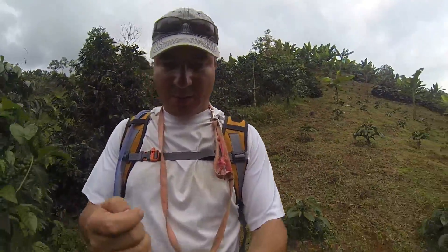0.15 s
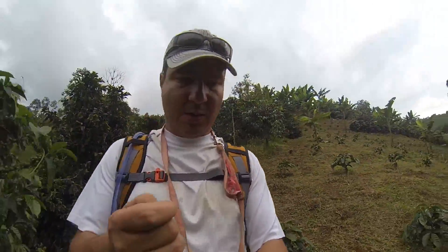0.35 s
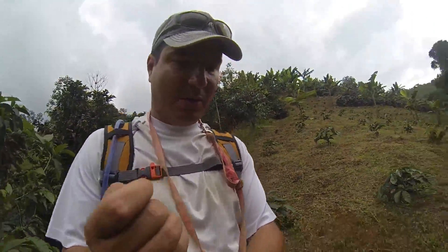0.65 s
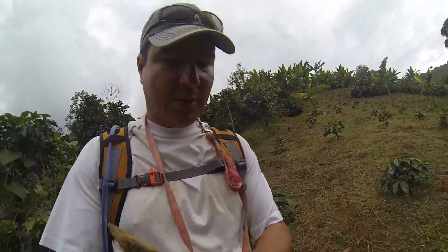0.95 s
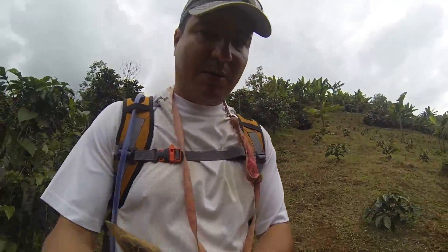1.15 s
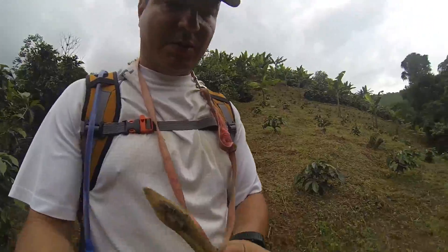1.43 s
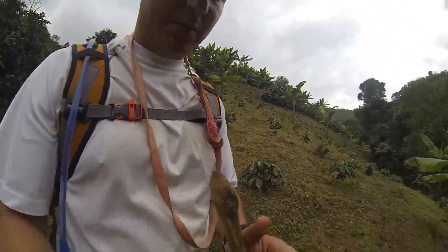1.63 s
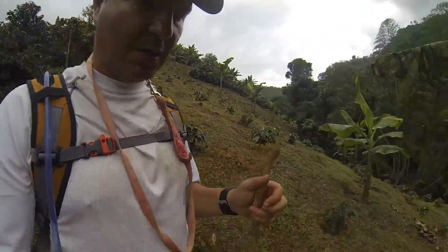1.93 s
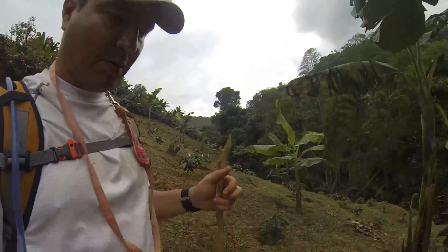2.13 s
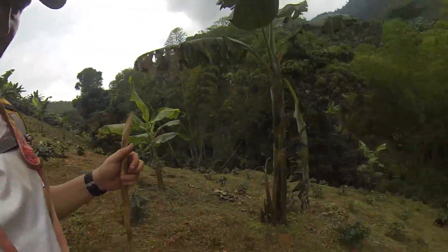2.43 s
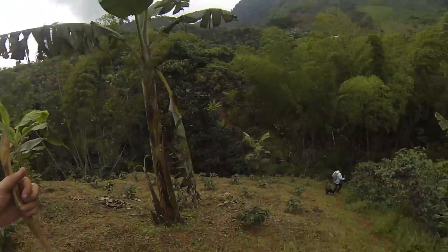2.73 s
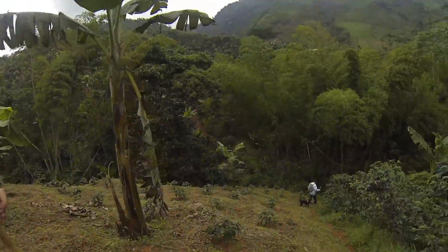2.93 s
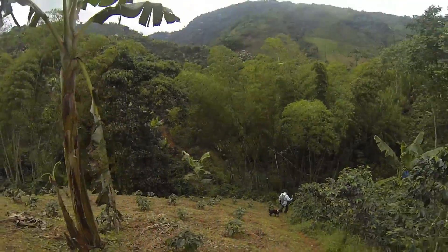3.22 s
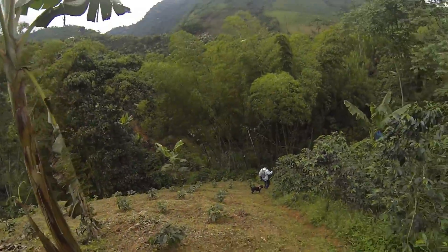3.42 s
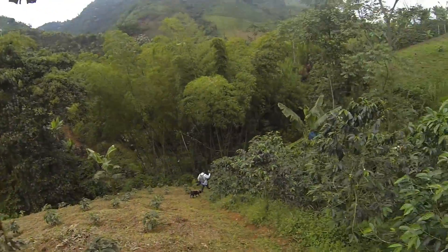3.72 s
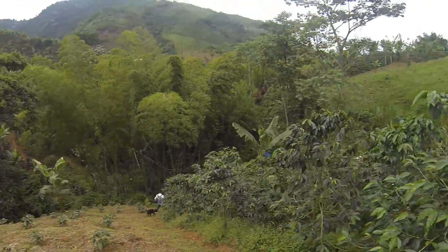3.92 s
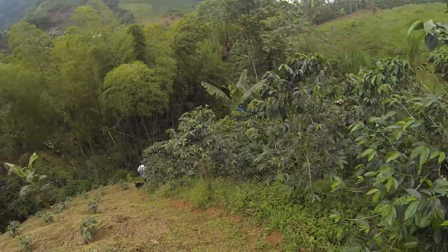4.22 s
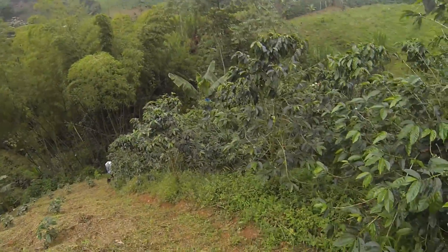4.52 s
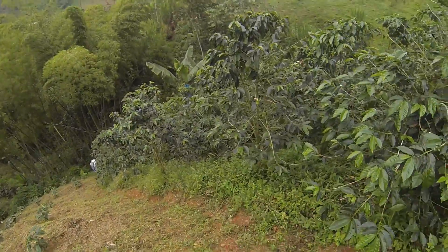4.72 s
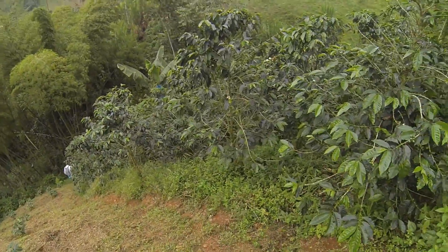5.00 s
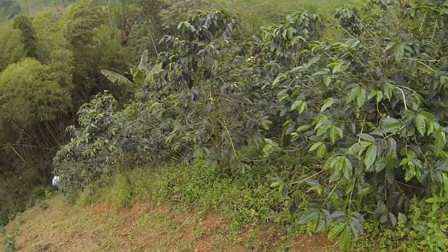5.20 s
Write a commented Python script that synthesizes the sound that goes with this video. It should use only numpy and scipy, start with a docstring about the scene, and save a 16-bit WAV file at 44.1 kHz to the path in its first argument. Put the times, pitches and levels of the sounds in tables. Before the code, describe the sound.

Handling noise comes straight through a plastic camera case outdoors: first small taps and rubs with a rumble of arm movement, then loud ringing knocks, low thumps and a short scrape as a hand slides along the pole. Skin creaks on the grip and a far bird whistles once, barely audible. After a final hard knock, only soft scuffs, low rumble, light hiss and a faint insect drone remain.

```python
"""A hiker on a quiet hillside swings round a cased camera on a pole, heard through pole and plastic case.
It opens on light knocks and rubs of the grip, over a low rumble as steps and arm movement shake the pole.
From 1.3 to 1.8 s hard knocks ring the case, the pole thumps and the hand slides with a scrape and squeak.
Sticking, slipping skin then creaks on the grip, and a far bird whistles once at 2.6 s.
After a last hard knock at 3.9 s it dies down to soft scuffs, with hiss and faint insects behind it all."""
import sys
import numpy as np
from scipy import signal
from scipy.fft import rfft, irfft
from scipy.io import wavfile
from scipy.ndimage import uniform_filter1d

SR = 44100
rng = np.random.default_rng(int(sys.argv[2]) if len(sys.argv) > 2 else 0)


def waveform_to_disk(signal):
    """Save audio, clipped to [-1, 1], as 16-bit WAV at the path in sys.argv[1]."""
    frames = np.transpose(np.atleast_2d(signal))
    scaled = np.clip(frames, -1, 1) * 32767
    samples = np.round(scaled).astype(np.int16)
    wavfile.write(sys.argv[1], SR, samples)


N = 236155
TIME = np.arange(N) / SR

# Hard knocks of the grip: start_s, peak_db, wall_pitch_hz, tilt_db_per_octave, contact_cutoff_hz
KNOCKS = [(0.012, -26.5, 1470, 8.5, 4000), (0.055, -37, 1470, 7, 3080), (0.182, -47.5, 1440, -4, 3000),
          (0.5134, -39, 1490, 8.5, 7500), (0.849, -36.5, 1500, 7, 3000), (0.964, -41.5, 1410, 9.5, 2960),
          (1.0849, -33, 1440, -3.5, 3880), (1.105, -26, 1540, 3, 1930), (1.1782, -34, 2320, -7, 4860),
          (1.273, -39, 1480, 2, 3000), (1.3508, -8.5, 1494, -0.5, 5000), (1.3701, -8.5, 1444, -2, 6850),
          (1.4493, -15.5, 2300, -1, 7960), (1.4515, -10.5, 2310, 4.5, 3200), (1.734, -8.5, 1443, -4, 2620),
          (1.998, -32.5, 1450, -6, 3000), (2.021, -34.5, 1550, 0.5, 3040), (2.034, -42, 2340, 9, 7000),
          (2.06, -34, 1530, 5.5, 5070), (2.221, -36, 1600, 5, 2950), (2.468, -36.5, 1430, -5.5, 3500),
          (2.514, -28, 1450, 1, 4000), (2.723, -38, 1440, 4, 3500), (2.971, -38.5, 1390, -4.5, 3000),
          (3.146, -43.5, 1480, 10.5, 7000), (3.189, -32, 1370, 2.5, 4020), (3.2112, -27.5, 1460, 2.5, 4000),
          (3.9108, -14, 1390, -7.5, 6000), (3.9149, -16, 1440, -2, 6450), (3.9343, -34, 1420, 2.5, 6100),
          (4.35, -45, 1500, 8, 7000), (4.506, -48, 1500, 13, 7000)]
# Resonances of pole and case: pitch_hz, width_hz, level_db
CASE_MODES = [(293.3, 49, -2), (390.6, 48.7, 0.5), (626, 193, -3.5), (790, 430, -18.5), (1860, 610, -9.5),
              (2299, 220, -6.5), (2682, 85, -13.5), (2896, 280, -20), (3600, 330, -20), (4130, 420, -23),
              (4720, 220, -24), (5740, 970, -25)]
# Rubs on the grip and, near the end, faint soft scuffs:
# start_s, end_s, level_db, slip_share (0-1), wall_pitch_hz, contact_cutoff_hz
RUBS_AND_SCUFFS = [(0.493, 0.561, -58.5, 0.4, 1486, 3500), (0.59, 0.612, -57, 0.75, 1480, 3000),
                   (0.656, 0.792, -56.5, 0.26, 1505, 3000), (0.769, 0.808, -53, 0.34, 1540, 3000),
                   (0.841, 0.914, -45, 0.53, 1496, 3600), (0.912, 0.985, -58.5, 0.4, 1670, 2750),
                   (1.082, 1.123, -50, 0, 1540, 3830), (1.126, 1.177, -46.5, 0.1, 1480, 3980),
                   (1.171, 1.204, -45, 0.16, 1577, 5600), (1.353, 1.381, -23, 0.12, 1465, 4570),
                   (2.029, 2.16, -51, 0.6, 1475, 3600), (2.202, 2.277, -38, 0.24, 1570, 2940),
                   (2.356, 2.384, -45, 0.42, 1556, 3600), (2.42, 2.516, -57.5, 0.8, 1524, 4000),
                   (2.49, 2.547, -40, 0.33, 1433, 4100), (2.57, 2.659, -37, 0.4, 1436, 4150),
                   (2.697, 2.77, -41.5, 0.42, 1440, 3200), (2.818, 2.919, -50, 0.28, 1403, 3500),
                   (3.149, 3.315, -52, 0.45, 1440, 4040), (3.176, 3.244, -35, 0.7, 1457, 4640),
                   (3.483, 3.581, -53, 0.45, 1376, 3000), (3.571, 3.645, -47, 0.6, 1438, 3570),
                   (3.911, 3.953, -34, 0.72, 1415, 4570), (4.324, 4.46, -65.5, 0.5, 1490, 5500),
                   (4.74, 4.822, -61, 0.3, 1580, 3000), (4.955, 5.01, -57, 0.5, 1660, 2980)]
# Envelope of the long hand slide, before each layer's trim: time_s, body_db, treble_db
SLIDE_ENVELOPE = [(1.385, -38.5, -49), (1.435, -30.5, -48), (1.447, -29.5, -47), (1.487, -32, -37.5),
                  (1.539, -42, -74), (1.599, -30.5, -50), (1.651, -42, -77), (1.72, -46, -65)]
# Soft jolts that flex the pole: start_s, level_db, pitch_hz, swell_s, upper_modes_relative_db
JOLTS = [(0.003, -20.5, 113, .014, -11), (0.148, -26, 61.6, 0.0099, -27), (0.501, -36.5, 110, 0.01, -6),
         (0.547, -12.5, 35.1, 0.024, -48), (0.69, -24.5, 103.7, 0.013, -23.5), (1.095, -18, 99, 0.012, -24),
         (1.139, -9, 83.6, 0.0097, -38), (1.189, -13, 94.3, 0.0096, -34.5), (1.3211, -6, 94.5, 0.0072, -28),
         (1.349, -6.5, 100, 0.0047, -37.5), (1.367, -4.5, 117.4, 0.0077, -29),
         (1.44, -10.5, 45.8, 0.017, -13), (1.732, -10.5, 114, 0.0066, -10.5),
         (1.997, -24.5, 120, 0.015, -24), (2.058, -23, 110.6, 0.02, -11), (2.462, -25.5, 112.3, 0.013, -28),
         (2.915, -21, 100, 0.0082, -33), (3.608, -26.5, 116, 0.019, -30), (3.9105, -9, 105, 0.0066, -13.5)]
# Upper bending modes of the pole: pitch_hz, relative_db, swell_s
BENDING_MODES = [(280, 2, 0.003), (375.6, -2, 0.0068)]
# Sway of the arm: time_s, level_db
SWAY_ENVELOPE = [(0.0, -26.5), (0.21, -30.5), (0.51, -31.5), (0.58, -29.5), (0.64, -33.5), (0.76, -22),
                 (0.95, -37), (1.16, -19.5), (1.29, -31), (1.47, -19), (1.52, -32), (3.64, -36),
                 (3.86, -34.5), (3.9, -20), (4.14, -45), (4.5, -27), (4.56, -36), (5.35, -45.5)]
# Colour of the air pushed round the case: frequency_hz, relative_db
SWAY_SPECTRUM = [(8, 0.5), (20, -5), (35, -1), (55, -16), (80, -15), (140, -42), (400, -92.5)]
# Trembling of the pole under the hand, before its trim: time_s, level_db
TREMOR_ENVELOPE = [(0.0, -49), (0.73, -44.5), (0.95, -48.5), (1.16, -51.5), (1.28, -35.5), (1.73, -48.5),
                   (2.46, -50.5), (2.62, -42), (3.56, -59), (3.74, -55.5), (4.25, -60), (4.6, -54),
                   (4.98, -63.5), (5.35, -66)]
# Colour of that trembling: frequency_hz, relative_db
TREMOR_SPECTRUM = [(40, -31), (80, -15), (113, 6), (150, -8.5), (220, -19), (300, -27), (380, -25),
                   (500, -38.5), (1000, -82)]
# Colour of the outdoor hiss: frequency_hz, relative_db
AIR_SPECTRUM = [(200, -2.5), (450, -6.5), (700, -9), (1100, -11), (1900, -12.5), (2400, -10), (3200, -14.5),
                (4400, -17), (6000, -21), (7500, -21.5), (9000, -26.5), (12000, -28), (15000, -34.5)]
# Insect buzzes: start_s, end_s, level_db, pitch_hz, width_hz
INSECTS = [(-3, 8.5, -75.5, 5100, 340), (3.38, 3.58, -77, 8350, 1200), (4.93, 5.04, -77, 8350, 800)]


def knocks(chatter=0.071, chatter_s=0.0024, brush=0.013, brush_s=0.0048, snap_db=-28):
    """Each knock rings the case with a brush of the hand, a sharp blow and brief chatter in the joint."""
    out = np.zeros(N)
    t = TIME[:SR // 20] - TIME[SR // 50]  # the window opens 20 ms before the blow; the brush swells into the blow and fades after it
    for start_s, peak_db, *touch in KNOCKS:
        grit = chatter * (t >= 0) * np.exp(-abs(t) / chatter_s) + brush * np.exp(-abs(t) / brush_s)
        blow = (t == 0) + grit * rng.standard_normal(len(t))
        ring = signal.fftconvolve(blow, case_ring(*touch))
        add(out, start_s + t[0], gain_of(peak_db) * ring / abs(ring).max())
        add(out, start_s, gain_of([peak_db + snap_db]))  # a thin snap bypasses the case
    return out


def case_ring(wall_hz, tilt_db, contact_hz, wall_db=0, leak_db=-45, pair_hz=135, width_hz=200, size=8192):
    """One touch rings pole and case; the wall's close pair of modes is tuned by where the hand presses."""
    f = np.abs(np.fft.fftfreq(size, 1 / SR))
    wall = sum(resonance(f, wall_hz + side * pair_hz, width_hz) ** 2 for side in (-.5, .5))
    body = sum((gain_of(db) * resonance(f, hz, width)) ** 2 for hz, width, db in CASE_MODES)
    power = gain_of(wall_db) ** 2 * wall + body + gain_of(leak_db) ** 2
    tilt = gain_of(tilt_db * np.log2(np.clip(f, 500, 6000) / wall_hz))
    gain = tilt * np.sqrt(power / (1 + (f / contact_hz) ** 6))  # a soft contact loses the treble
    minimum_phase = np.exp(np.conj(signal.hilbert(np.log(gain + 1e-6))))  # no ring before the touch
    return np.fft.ifft(minimum_phase).real[:size // 2]


def rubs_and_scuffs(usual_wall_hz=1480, wall_damping=0.67, wobble_damping=0.97):
    """Strokes ring the case and drag the pole into a wobble; a tight grip is brighter and damps both."""
    out = np.zeros(N)
    for start_s, end_s, level_db, slip_share, wall_hz, contact_hz in RUBS_AND_SCUFFS:
        t = TIME[:int((end_s - start_s) * SR)]
        tilt_db = 53.5 * np.log2(wall_hz / usual_wall_hz)  # brightness follows the wall's pitch
        force = stick_slip(len(t), slip_share) * arch(t, 0, t[-1])
        case = case_ring(wall_hz, tilt_db, contact_hz, wall_db=1 - wall_damping * tilt_db)
        ring = signal.fftconvolve(force, case)
        add(out, start_s, gain_of(level_db) * ring / np.sqrt(np.sum(ring ** 2) / len(t)))
        wobble_db = level_db + 7 - wobble_damping * tilt_db
        add(out, start_s, gain_of(wobble_db) * flex(pitch_hz=116, swell_s=0.021))
    return out


def slide(scrape_trim_db=-5, squeak_trim_db=-6, rasp_trim_db=-4.5, fade_db_per_s=146):
    """The hand slides along the grip: a dull scrape, a thin squeak and, where it is fast, a bright rasp."""
    out = np.zeros(N)
    times, body_db, treble_db = np.transpose(SLIDE_ENVELOPE)
    start_s = times.mean() - .5
    t = start_s + TIME[:SR]
    fade_db = -fade_db_per_s * abs(t - np.clip(t, times[0], times[-1]))  # beyond the envelope's ends
    scrape = case_ring(wall_hz=1440, tilt_db=3.5, contact_hz=2350, wall_db=-1)
    squeak = case_ring(wall_hz=2320, tilt_db=1.5, contact_hz=2900, wall_db=1.5)
    bright = case_ring(wall_hz=1440, tilt_db=-0.5, contact_hz=5300, wall_db=-23, leak_db=-47.5)
    rasp = signal.sosfilt(signal.butter(4, 3600, "high", fs=SR, output="sos"), bright)
    for ring, level_db in ((scrape, body_db + scrape_trim_db), (squeak, body_db + squeak_trim_db),
                           (rasp, treble_db + rasp_trim_db)):
        envelope = gain_of(np.interp(t, times, level_db) + fade_db)
        force = envelope * stick_slip(len(t), slip_share=0.25, spread_db=1.5)
        add(out, start_s, signal.fftconvolve(force, ring / np.linalg.norm(ring)))
    return out


def stick_slip(length, slip_share, slips_per_s=210, unevenness=0.34, spread_db=0.5):
    """Sticking and slipping, as of skin on the grip: uneven tiny jerks over a smooth friction hiss."""
    gaps, sizes, hiss = rng.standard_normal((3, SR))
    onsets = (np.cumsum(np.exp(unevenness * gaps)) * SR / slips_per_s).astype(int)
    onsets = onsets[onsets < length]
    slips = np.zeros(length)
    slips[onsets] = gain_of(spread_db * sizes[:len(onsets)])
    return np.sqrt(slip_share) * unit_rms(slips) + np.sqrt(1 - slip_share) * hiss[:length]


def jolts():
    """Shoves of the hand flex the pole with a low thump; each rings its upper modes by its own amount."""
    out = np.zeros(N)
    upper_modes = sum(gain_of(db) * flex(hz, swell_s) for hz, db, swell_s in BENDING_MODES)
    for start_s, level_db, pitch_hz, swell_s, upper_db in JOLTS:
        thump = flex(pitch_hz, swell_s) + gain_of(upper_db) * upper_modes
        add(out, start_s, gain_of(level_db) * thump)
    return out


def flex(pitch_hz, swell_s):
    """The pole bends for a few cycles and the hand damps it."""
    t = TIME[:SR // 4]
    envelope = (t / swell_s * np.exp(1 - t / swell_s)) ** 2
    return envelope * np.sin(2 * np.pi * pitch_hz * t)


def rumble(tremor_trim_db=2):
    """Arm movement pushes air round the case and keeps the pole trembling."""
    sway_db = np.interp(TIME, *np.transpose(SWAY_ENVELOPE))
    tremor_db = np.interp(TIME, *np.transpose(TREMOR_ENVELOPE)) + tremor_trim_db
    sway = gain_of(sway_db) * steadied(noise(SWAY_SPECTRUM))
    tremor = gain_of(tremor_db) * steadied(noise(TREMOR_SPECTRUM))
    return sway + tremor


def hillside_air(hiss_db=-61, ring_db=-67):
    """An even bed of outdoor hiss with a hollow ring from the case wall."""
    hiss = gain_of(hiss_db) * noise(AIR_SPECTRUM)
    return hiss + gain_of(ring_db) * noise_band(pitch_hz=1490, width_hz=250)


def insects():
    """Distant insects buzz in high bands of noise: one drone throughout and two short calls."""
    return sum(gain_of(level_db) * arch(TIME, start_s, end_s) * noise_band(pitch_hz, width_hz)
               for start_s, end_s, level_db, pitch_hz, width_hz in INSECTS)


def bird(level_db=-75, low_hz=6150, top_hz=6580):
    """One thin, far whistle that rises and falls."""
    swell = arch(TIME, 2.58, 2.78)
    pitch_hz = low_hz + (top_hz - low_hz) * swell
    return gain_of(level_db) * swell * np.sin(2 * np.pi * np.cumsum(pitch_hz) / SR)


def noise(spectrum):
    """Noise of rms 1, coloured by points of frequency_hz, relative_db."""
    hz, db = np.transpose(spectrum)
    colour = gain_of(np.interp(np.log(np.fft.rfftfreq(N, 1 / SR) + 1), np.log(hz), db))
    return unit_rms(irfft(rfft(rng.standard_normal(N)) * colour, N))


def noise_band(pitch_hz, width_hz):
    """Noise of rms 1 through one resonance."""
    colour = resonance(np.fft.rfftfreq(N, 1 / SR), pitch_hz, width_hz)
    return unit_rms(irfft(rfft(rng.standard_normal(N)) * colour, N))


def resonance(f, pitch_hz, width_hz):
    """Gain of a steep-sided resonant peak."""
    return 1 / (1 + (2 * (f - pitch_hz) / width_hz) ** 2)


def arch(t, start_s, end_s):
    """A half-sine swell and fade between two times."""
    return np.sin(np.pi * np.clip((t - start_s) / (end_s - start_s), 0, 1))


def steadied(x):
    """Rides out the slow swells of a noise, keeping its quick lumps."""
    return x / np.sqrt(uniform_filter1d(x ** 2, size=6000) + 1e-6)


def unit_rms(x):
    """Scales to rms 1."""
    return x / np.sqrt(np.mean(x ** 2) + 1e-20)


def gain_of(db):
    """Decibels to amplitude."""
    return 10 ** (np.asarray(db) / 20)


def add(mix, start_s, sound):
    """Drops a sound into the mix, trimming any overhang."""
    at = round(start_s * SR)
    part, sound = mix[max(at, 0):], sound[max(-at, 0):]
    part[:len(sound)] += sound[:len(part)]


def scene():
    """Handling noise up close over the quiet hillside, in mono."""
    foreground = knocks() + rubs_and_scuffs() + slide() + jolts() + rumble()
    return (foreground + hillside_air() + insects() + bird())[None]


def record(dry):
    """A steep low-pass takes off the very top, above 15.6 kHz."""
    lowpass = signal.firwin(511, 15600, window=("kaiser", 9), fs=SR)
    return signal.oaconvolve(dry, lowpass[None], "same")


dry = scene()
out = record(dry)
waveform_to_disk(out)
```